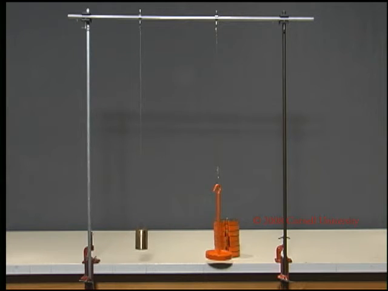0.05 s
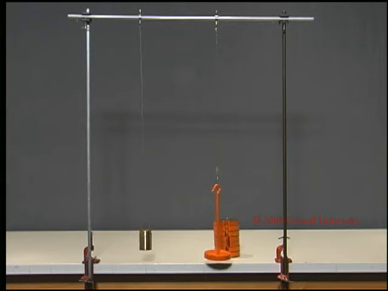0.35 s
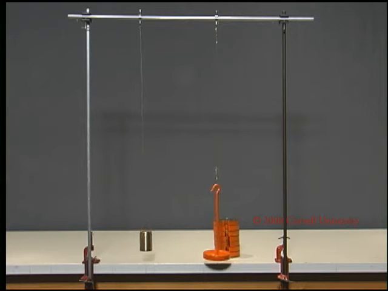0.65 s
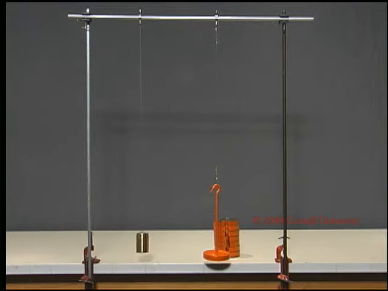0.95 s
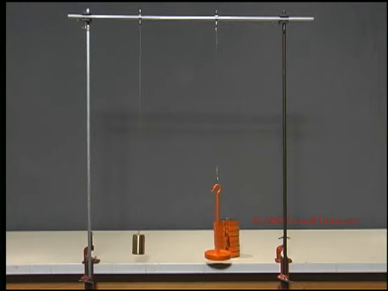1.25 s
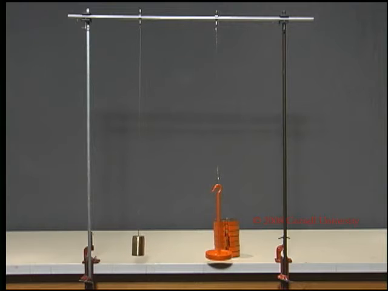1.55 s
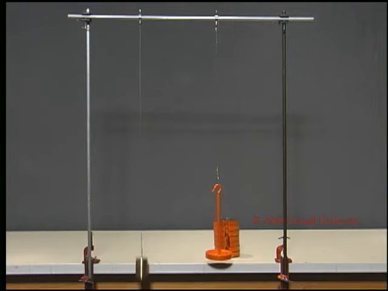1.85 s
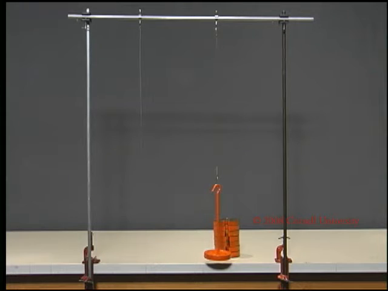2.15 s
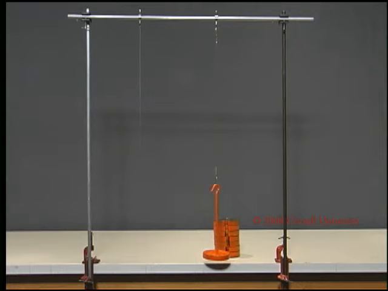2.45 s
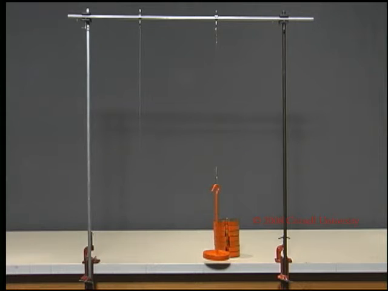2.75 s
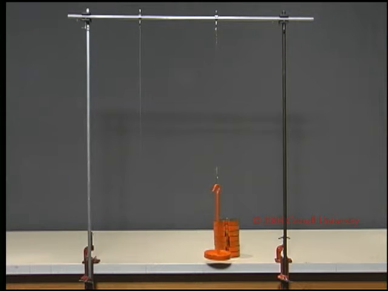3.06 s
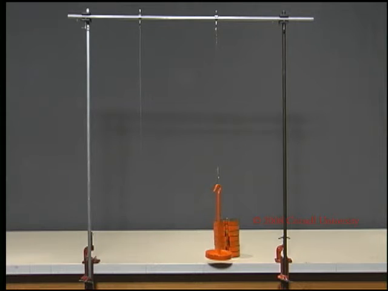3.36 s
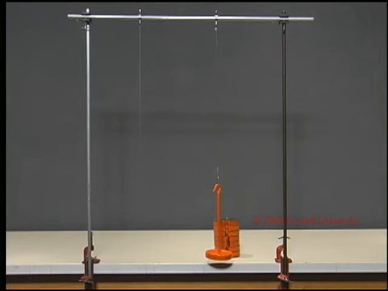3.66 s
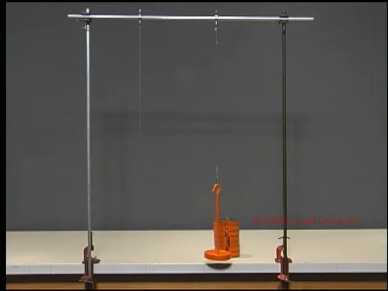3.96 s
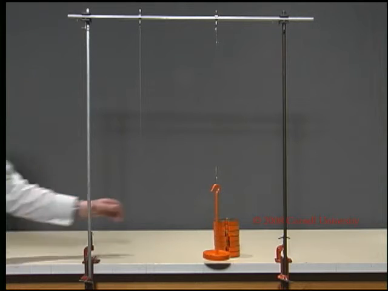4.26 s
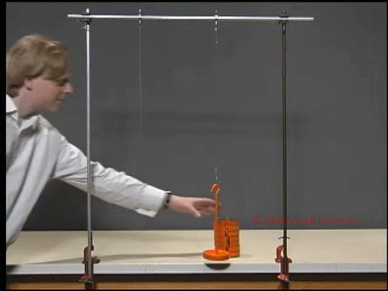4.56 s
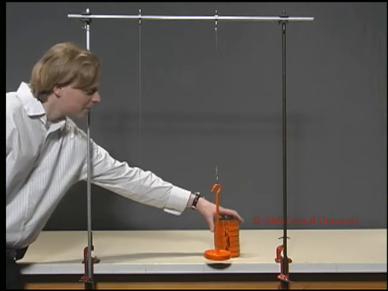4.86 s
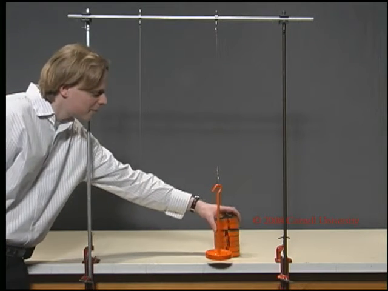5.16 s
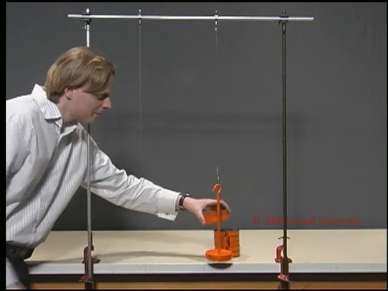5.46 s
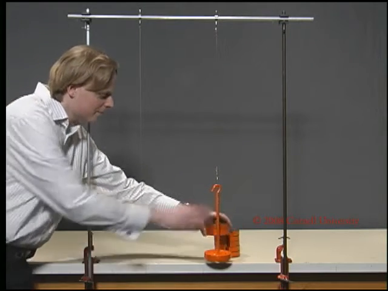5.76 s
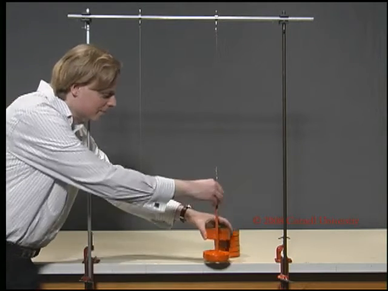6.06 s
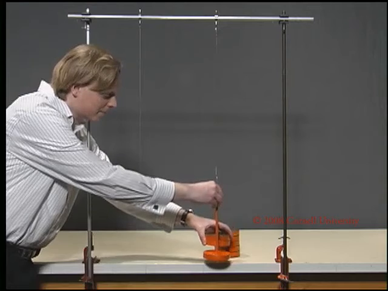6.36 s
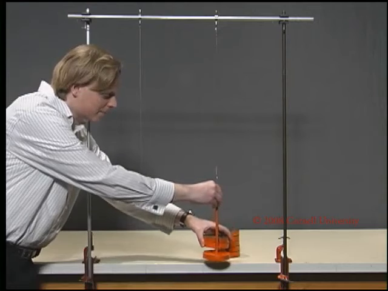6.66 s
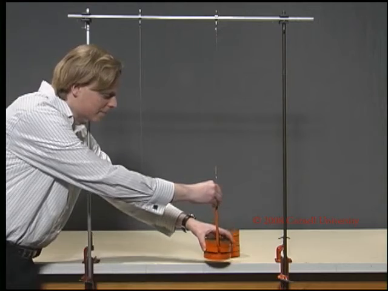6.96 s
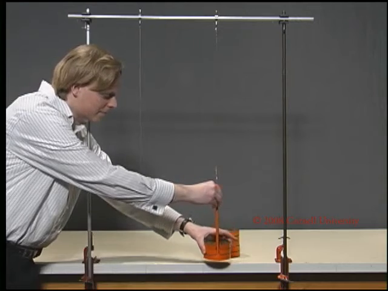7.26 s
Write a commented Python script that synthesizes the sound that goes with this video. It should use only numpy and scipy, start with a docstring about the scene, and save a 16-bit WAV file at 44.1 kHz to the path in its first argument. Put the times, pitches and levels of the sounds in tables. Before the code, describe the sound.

After a faint twang, metal weights slam onto a bench, then someone handles the plates with soft knocks and clinks in a humming room.

```python
"""Lab weights crash onto a bench

Metal weights slip off a twanging stand, hit the bench and bounce, overloading the microphone.
Small knocks follow; someone reaches over with rustling sleeves and stacks slotted plates on a
clinking hanger. Each hit is a click with a short rattle; wherever bench or metal rings, it is a
set of dying sines. A lecture room with humming ventilation rings around it all."""
import sys
import numpy as np
from scipy import signal
from scipy.fft import rfft, irfft
from scipy.io import wavfile
from scipy.ndimage import uniform_filter1d

SR = 44100
rng = np.random.default_rng(int(sys.argv[2]) if len(sys.argv) > 2 else 0)


def dump_mix(stems):
    """Bounce the given channels to the path in sys.argv[1] as a 16-bit WAV at rate SR."""
    frames = np.atleast_2d(stems).T  # one column per channel
    limited = np.clip(frames, -1, 1)  # hard clip at full scale
    pcm = np.round(limited * 32767).astype(np.int16)
    wavfile.write(sys.argv[1], SR, pcm)


N = 326781

# decay of the lecture room: band_hz, t60_s
ROOM_DECAY = [(100, 0.94), (260, 0.58), (700, 0.68), (1840, 0.8), (4850, 0.5), (8000, 0.39), (13000, 0.27)]
# colour of the ventilation air: freq_hz, relative_db
AIR_COLOUR = [(12, -19.5), (22, 4), (31, 3), (42, -6.5), (65, -1.5), (92, -10.5), (124, 0.5), (183, -11.5),
              (270, -8), (310, -17), (387, -10.5), (445, -16), (490, -12.5), (560, -18.5), (1100, -23),
              (1800, -28), (2600, -36.5), (4100, -43), (15000, -47)]
# mains, fans and a monitor's beating whine: pitch_hz, level_db
HUM_LINES = [(30.5, -71.5), (64.6, -71), (119.8, -67.5), (241, -78.5), (360.3, -65), (388.5, -68),
             (479.6, -64.5), (15735, -76.5), (15743, -89.5)]
# colour of sliding cloth: freq_hz, relative_db
CLOTH_COLOUR = [(290, -40), (500, -6.5), (545, -10.5), (859, -8.5), (1330, -12), (1650, -10), (1800, -12.5),
                (7160, -20.5), (15000, -30.5)]
# arm and body movements: peak_s, half_length_s, level_db
ARM_MOVES = [(4.119, .42, -71.5), (4.553, 0.097, -63), (4.76, 0.093, -67.5), (5.2, .12, -71.5),
             (5.566, 0.074, -66), (5.836, 0.17, -59)]
# dull knocks and ticks: start_s, level_db, pitch_hz, rattle_relative_db, thump_relative_db
KNOCK_HITS = [(3.2736, -29, 1500, -4, -9), (3.2808, -36, 2960, -2, -24), (3.2924, -29.5, 1260, -2.5, -9.5),
              (3.6233, -52, 2110, 1.5, -27), (3.8564, -46, 3480, -6, -22), (3.8998, -32.5, 1300, -3.5, -26),
              (4.193, -43.5, 1610, -5.5, -24), (4.2160, -39, 1294, -2.5, 4), (4.259, -47.5, 1000, 6, -4),
              (4.6112, -42, 3100, -12, -16), (5.2062, -34, 1000, -0.5, -7.5), (5.2300, -43, 483, 4, 7.5),
              (5.254, -43.5, 1040, 5.5, -8), (5.6305, -41.5, 1170, -4, -17), (6.3556, -41.5, 870, 5, -24),
              (6.3571, -33.5, 5900, -12, -38), (7.0580, -34, 1740, -4.5, -34),
              (7.3787, -31.5, 1920, 3, -20), (7.392, -10, 2200, -4.5, -39)]
# plates touching the hanger: start_s, hanger_db, plate_db, pitch_hz
CLINK_HITS = [(6.3559, -40, -47, 4795), (6.7102, -50.5, -73, 2230), (6.8304, -49.5, -76, 3100),
              (6.873, -70.5, -79, 4460), (6.9707, -50.5, -63, 2250), (7.057, -81, -50, 1850),
              (7.297, -68.5, -55.5, 6020), (7.3848, -55, -37.5, 6000), (7.3922, -57, -28.5, 5500)]
# the fall and its bounces: start_s, level_db, brightness_hz, rattle_relative_db
CRASH_HITS = [(2.3303, 6.5, 6200, 9.5), (2.3374, 9, 12000, -2), (2.3750, -10, 1800, -1.5),
              (2.4318, -12, 2200, 2.5), (2.530, -20, 1300, -2), (2.6335, -2, 3550, 2.5),
              (2.6598, -0.5, 2410, -0.5), (2.7076, -22, 930, 7.5), (2.7469, -14.5, 457, 2)]
# colour of a heavy blow on the bench: freq_hz, relative_db
CRASH_COLOUR = [(24, -58), (40, -24.5), (108, -5), (165, -10.5), (263, -4.5), (373, -8.5), (554, -4.5),
                (659, -8.5), (933, -7.5), (1530, -14), (1730, -15), (1920, -17), (7130, -25.5),
                (10500, -30.5), (15000, -40.5)]
# ring of the hanger: pitch_hz, relative_db, t60_s
HANGER_RING = [(1532, -5, 0.22), (2590, 0, 0.12), (3103, -4.5, 0.13), (3390, -10, 0.091),
               (3940, -12.5, 0.33), (4480, -21, 0.15), (5160, -12, 0.12), (5360, -21, 0.15),
               (7920, -26, 0.14), (8726, -16, 0.13), (9310, -11, 0.11)]
# ring of a slotted plate: pitch_hz, relative_db, t60_s
PLATE_RING = [(1580, 4, 0.045), (1860, -6, 0.34), (2340, 9, 0.039), (4920, -8, 0.094), (5200, -5, 0.063)]
# twang of the unloaded stand: pitch_hz, relative_db, t60_s
STAND_TWANG = [(151, -15, .8), (188, -8.5, 0.99), (319.2, -8.5, 0.69), (374, -5.5, 0.6), (593, -13.5, 0.69),
               (810, -12.5, .37), (3690, -24, 0.17), (4100, -28, 0.18), (5400, -24, 0.12),
               (7300, -8, 0.056)]
# body of the bench: pitch_hz, relative_db, t60_s
BENCH_RING = [(115, 1, 0.46), (191, -8.5, 0.56), (270.4, 4.5, 0.8), (317, -2, 0.26), (411, 4, 0.63),
              (441, 1, 0.66), (570, 3, 0.71), (706, 3, 0.63), (744, -1, 0.55), (841.5, -0.5, 0.61),
              (920.4, 4, .5), (1056, 4, .55), (1147, -1, 0.62), (1235, 1, 0.6)]
# iron plates and stand, jolted by a blow: pitch_hz, relative_db, t60_s
IRON_RING = [(1300, -17.5, 1.2), (1740, -3.5, .42), (2220, 5.5, 0.38), (2440, -8, 0.43), (2900, -6, .35),
             (3140, -4.5, 0.3), (3920, -7.5, .4), (4270, -11.5, 0.55), (6150, 0, .25)]
# thin ring of the small weight: pitch_hz, relative_db, t60_s
WEIGHT_RING = [(7000, -11.5, .24), (8323, -11, .23), (9636, -11, .18), (11390, -12, .26), (13420, -15, .28),
               (14430, -12, .33)]

CLICK_HZ = np.fft.rfftfreq(4096, 1 / SR) + 1  # frequency axis for click spectra, kept above zero


def amp(db):
    """Decibels to gain."""
    return 10 ** (np.asarray(db) / 20)


def unit_rms(x):
    """Scales to rms 1."""
    return x / np.sqrt(np.mean(x ** 2) + 1e-20)


def curve_at(points, hz):
    """Reads a curve on a log-frequency axis."""
    point_hz, value = np.transpose(points)
    return np.interp(np.log(hz + 1), np.log(point_hz + 1), value)


def noise(colour):
    """Steady noise of a given colour, rms 1."""
    gain = amp(curve_at(colour, np.fft.rfftfreq(N, 1 / SR)))
    return unit_rms(irfft(rfft(rng.standard_normal(N)) * gain, N))


def drift(rate_hz):
    """Smooth random wandering, rms 1."""
    gain = np.exp(-(np.fft.rfftfreq(N, 1 / SR) / rate_hz) ** 2)
    return unit_rms(irfft(rfft(rng.standard_normal(N)) * gain, N))


def click(spectrum):
    """A sharp-fronted, minimum-phase click of a given spectrum, peak 1."""
    log_gain = np.log(np.maximum(spectrum / spectrum.max(), 1e-5))
    mirrored = np.r_[log_gain, log_gain[-2:0:-1]]
    pulse = np.fft.ifft(np.exp(np.conj(signal.hilbert(mirrored)))).real
    return -pulse / abs(pulse).max()


def band(low_hz, high_hz, low_slope, high_slope=4.0):
    """Spectrum of a contact: the object's size cuts the bass, its softness the treble."""
    bass_cut = 1 + (low_hz / CLICK_HZ) ** (2 * low_slope)
    treble_cut = 1 + (CLICK_HZ / high_hz) ** (2 * high_slope)
    return 1 / np.sqrt(bass_cut * treble_cut)


def fade_in(sound, rise_s):
    """Softens the attack with an exponential rise."""
    return sound * (1 - np.exp(-np.arange(len(sound)) / SR / rise_s))


def ring(modes, mode_gain=lambda hz: 1, tuning=1, twin_db=-7):
    """Dying sines of a struck body; each mode has a close twin that makes it beat."""
    t = np.arange(2 * SR) / SR
    out = np.zeros(len(t))
    for (hz, db, t60), (split, offset) in zip(modes, rng.uniform(-1, 1, (len(modes), 2))):
        phase = 2 * np.pi * hz * tuning * t
        beat_hz = 9 * split * np.sqrt(hz / 1000)
        twin = fade_in(np.sin(phase + 2 * np.pi * beat_hz * t + np.pi * offset), 0.0084)
        out += mode_gain(hz) * amp(db - 60 * t / t60) * (np.sin(phase) + amp(twin_db) * twin)
    return fade_in(out, 0.0035)  # the vibration takes a moment to spread


def room_tail(build_s=0.012, patchy_db=2.0):
    """Diffuse reverb of energy 1; each band dies at its own speed, and echoes arrive in clumps."""
    hz, t, wash = signal.stft(rng.standard_normal(SR), SR, nperseg=512)
    clumps = uniform_filter1d(rng.standard_normal(wash.shape), size=3, axis=0)
    clumps = unit_rms(uniform_filter1d(clumps, size=7, axis=1))
    decay = amp(patchy_db * clumps - 60 * t / curve_at(ROOM_DECAY, hz)[:, None])
    tail = fade_in(signal.istft(wash * decay, SR, nperseg=512)[1][:SR], build_s)
    return tail / np.linalg.norm(tail)


def impact(spectrum, rattle_db, room_db, rattle_s, echo_db, echo_s=0.0052):
    """One contact: a click, a brief rattle, one quick echo of the click, and the room."""
    t = np.arange(SR) / SR
    rattle = fade_in(rng.standard_normal(SR) * np.exp(-t / rattle_s), 0.0028)
    response = amp(rattle_db) * rattle / np.linalg.norm(rattle) + amp(room_db) * room_tail()
    response[0] += 1
    response[round(echo_s * SR)] += amp(echo_db)
    return signal.fftconvolve(click(spectrum), response)


def add(mix, start_s, sound):
    """Lays a sound into the mix."""
    part = mix[round(start_s * SR):][:len(sound)]
    part += sound[:len(part)]


def ventilation(air_db=-58):
    """A bed of steady air noise, with hum lines that waver a little in level and phase."""
    t = np.arange(N) / SR
    hum = np.zeros(N)
    for hz, db in HUM_LINES:
        level = amp(db + drift(1.2))
        hum += level * np.sin(2 * np.pi * (hz * t + rng.random()) + 0.15 * drift(2))
    return amp(air_db) * noise(AIR_COLOUR) + hum


def sleeves(uneven_db=0.6):
    """Shirt cloth slides in a fine, slightly uneven hiss that swells and fades with each movement."""
    t = np.arange(N) / SR
    power = sum((amp(db) / np.cosh((t - peak_s) / half_s)) ** 2 for peak_s, half_s, db in ARM_MOVES)
    return np.sqrt(power) * amp(uneven_db * drift(60)) * noise(CLOTH_COLOUR)


def stand_release(start_s=1.869, snap_db=-46, shudder_db=-40.5, twang_db=-37):
    """The load slips off with a thin snap; the unloaded stand shudders and twangs."""
    out = np.zeros(N)
    twang = fade_in(ring(STAND_TWANG), 0.013)
    snap = impact(band(2450, 6500, low_slope=2.5), rattle_db=9, room_db=-3, rattle_s=0.0079, echo_db=-9)
    shudder = impact(band(740, 1100, low_slope=1.6), rattle_db=8, room_db=3, rattle_s=0.02, echo_db=-6)
    add(out, start_s, amp(snap_db) * snap)
    add(out, start_s + 0.007, amp(shudder_db) * shudder)
    add(out, start_s, amp(twang_db) * twang)
    return out


def hanger_clinks(grip_s=6.83, grip_tuning=1.013, reach_octaves=0.74, half_width_hz=90):
    """Each plate ticks through the hanger's resonances and rings the modes near its contact pitch."""
    out = np.zeros(N)
    for start_s, hanger_db, plate_db, pitch_hz in CLINK_HITS:
        def excite(hz):
            """Nearby modes ring most; where the touch lands shifts each by a few dB, by chance."""
            strike_spot = amp(3 * rng.standard_normal())
            return strike_spot / (1 + (np.log2(hz / pitch_hz) / reach_octaves) ** 2)
        tuning = grip_tuning if start_s > grip_s else 1  # grip and load step the hanger's pitch up
        add(out, start_s, amp(hanger_db) * ring(HANGER_RING, excite, tuning))
        add(out, start_s, amp(plate_db) * ring(PLATE_RING, excite))
        peaks = sum(1 / (1 + ((CLICK_HZ - hz * tuning) / half_width_hz) ** 2) for hz, _, _ in HANGER_RING)
        contact = band(0.5 * pitch_hz, 1.3 * pitch_hz, low_slope=0.46, high_slope=3.0)
        tick = impact(contact * (amp(-14) + peaks), rattle_db=3, room_db=-6, rattle_s=0.005, echo_db=-19)
        add(out, start_s, amp(hanger_db + 7.5) * tick)
    return out


def bench_knocks():
    """Small things knock on the bench, one edge and then the other; the bench top adds a low thump."""
    out = np.zeros(N)
    bench_top = band(116, 330, low_slope=2.1, high_slope=1.81)
    for start_s, db, pitch_hz, rattle_db, thump_db in KNOCK_HITS:
        # the smaller the object, the narrower its knock and the more steeply it loses its bass
        spread = 1 + 0.66 / (1 + pitch_hz / 990)
        low_slope = 1.2 + (pitch_hz / 1600) ** 1.5
        contact = band(pitch_hz / spread, pitch_hz * spread, low_slope, high_slope=4.84)
        room_db = -9 + 1.1 * rattle_db
        # the echo is the other edge, landing later and softer
        knock = impact(contact, rattle_db, room_db, rattle_s=0.017, echo_db=-11.5, echo_s=0.0074)
        thump = impact(bench_top, rattle_db=2, room_db=-3, rattle_s=0.0086, echo_db=-15)
        add(out, start_s, amp(db) * (knock + amp(thump_db) * thump))
    return out


def weight_crashes(ring_db_per_db=0.49):
    """The weights hit the bench; softer bounces are duller; bench and metal ring on."""
    out = np.zeros(N)
    for start_s, db, bright_hz, rattle_db in CRASH_HITS:
        # a gentle contact is smoother, so its treble also falls more steeply
        contact = band(65, bright_hz, low_slope=3.6, high_slope=0.84 + 1200 / bright_hz)
        colour = amp(curve_at(CRASH_COLOUR, CLICK_HZ)) * contact
        room_db = -10.5 + 1.56 * rattle_db  # a blow that rattles more fills the room more
        hit = impact(colour, rattle_db, room_db, rattle_s=0.013, echo_db=-13, echo_s=0.0057)
        bench = ring(BENCH_RING)
        iron = amp(-1.5) * ring(IRON_RING, lambda hz: 1 / (1 + (hz / bright_hz) ** 2))
        ringing = amp(-39.5) * (bench + iron) + amp(-59.5) * ring(WEIGHT_RING, twin_db=-1)
        add(out, start_s, amp(db) * hit)
        add(out, start_s, amp(ring_db_per_db * db) * ringing)
    # after its last bounce the small weight rings freely
    shimmer = ring(WEIGHT_RING, twin_db=4)
    reverb = signal.fftconvolve(shimmer, room_tail())[:len(shimmer)]
    add(out, CRASH_HITS[-1][0], amp(-54) * fade_in(shimmer + amp(-10) * reverb, 0.014))
    return out


def scene():
    """All sources at one microphone."""
    hits = stand_release() + weight_crashes() + bench_knocks() + hanger_clinks()
    return (hits + sleeves() + ventilation())[None]


def record(dry, ceiling_db=-1.5, threshold_db=-17, duck_db_per_db=0.44, recover_db_per_s=55):
    """The input stage clips, a limiter ducks and recovers, and the extreme lows and highs are cut."""
    drive = dry[0] / amp(ceiling_db)
    clipped = amp(ceiling_db) * drive / (1 + drive ** 6) ** (1 / 6)
    pole = np.exp(-1 / (0.006 * SR))  # 6 ms level detector
    level_db = 10 * np.log10(signal.lfilter([1 - pole], [1, -pole], clipped ** 2) + 1e-12)
    recovery_db = np.arange(N) / SR * recover_db_per_s
    held_db = np.maximum.accumulate(level_db + recovery_db) - recovery_db
    limited = clipped * amp(-duck_db_per_db * np.maximum(held_db - threshold_db, 0))
    low_cut = signal.butter(2, 38, "high", fs=SR, output="sos")
    high_cut = signal.firwin(511, 16100, window=("kaiser", 9), fs=SR)
    return signal.oaconvolve(signal.sosfilt(low_cut, limited), high_cut, "same")[None]


dry = scene()
out = record(dry)
dump_mix(out)
```